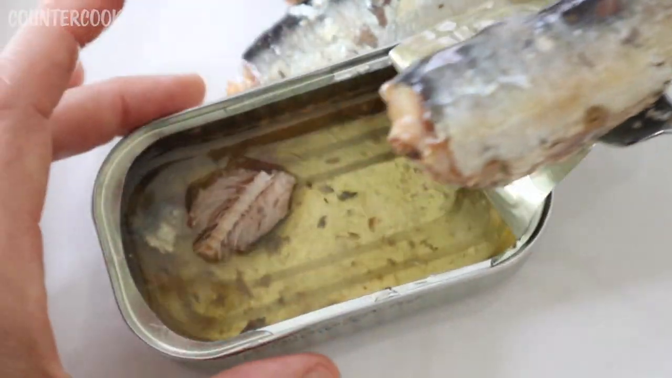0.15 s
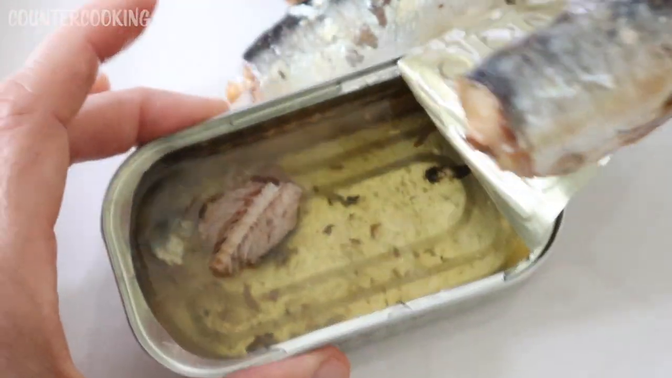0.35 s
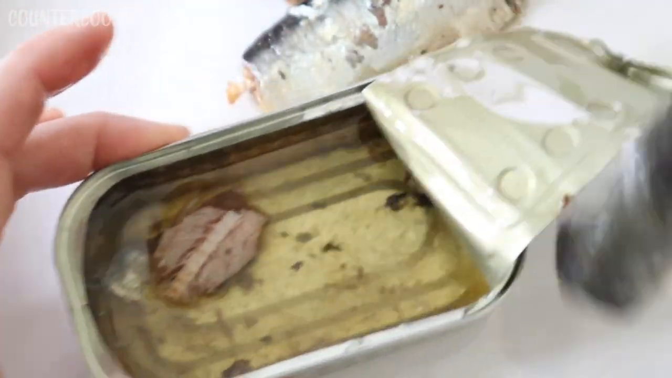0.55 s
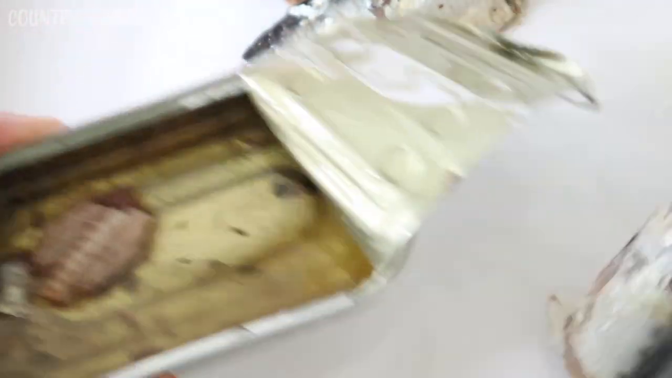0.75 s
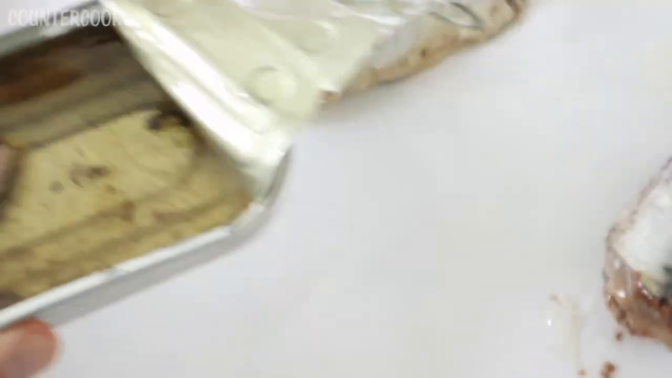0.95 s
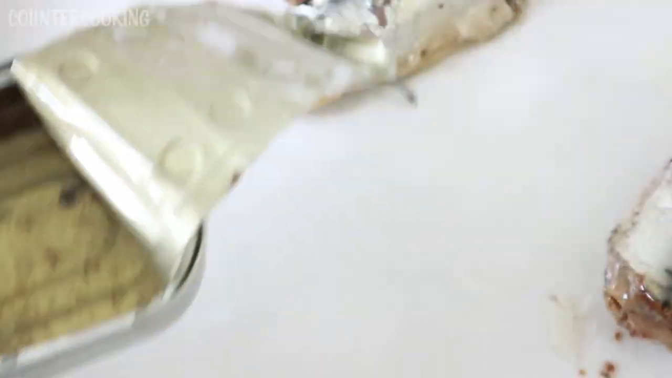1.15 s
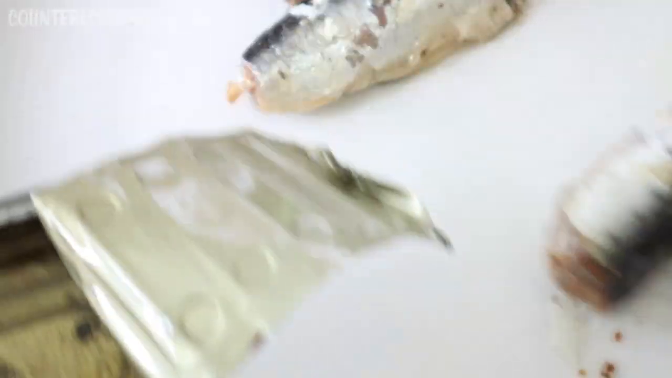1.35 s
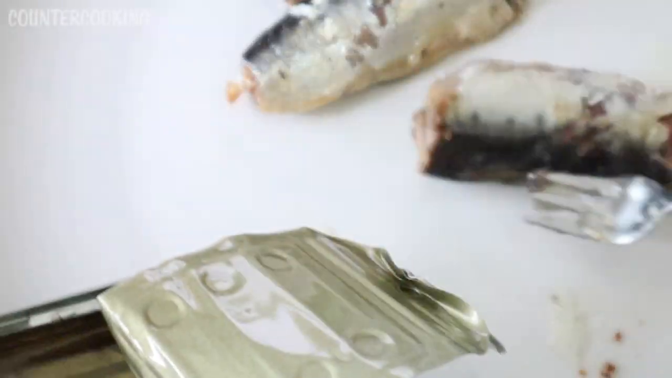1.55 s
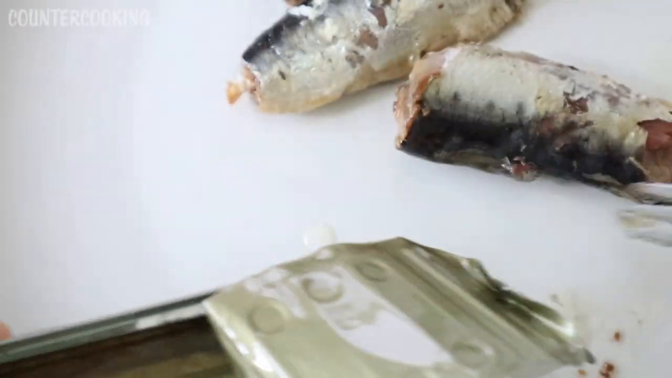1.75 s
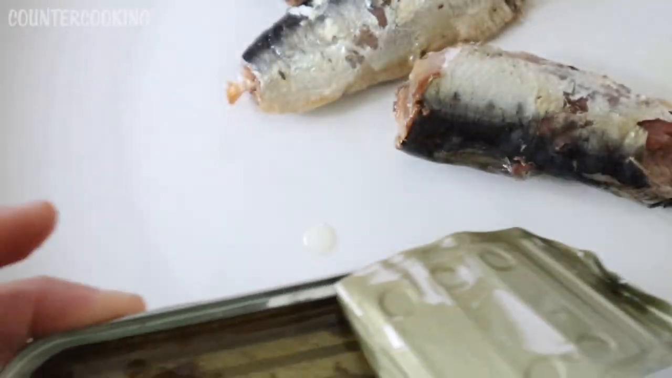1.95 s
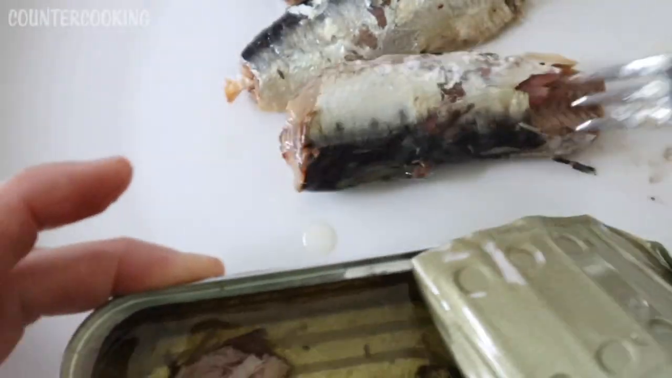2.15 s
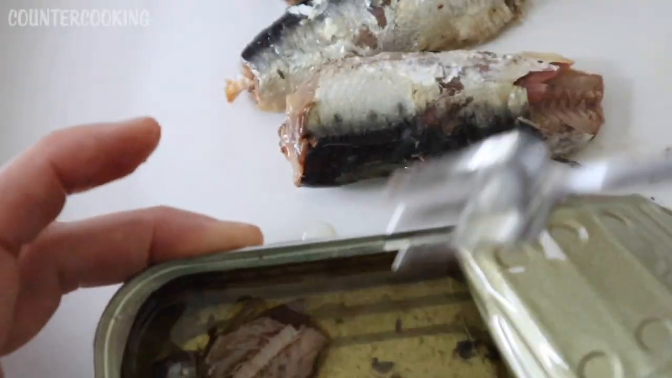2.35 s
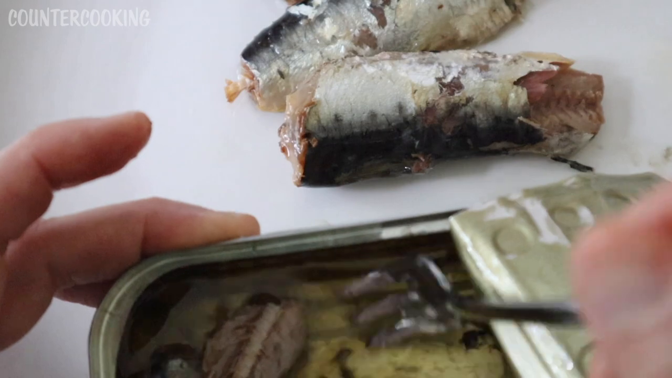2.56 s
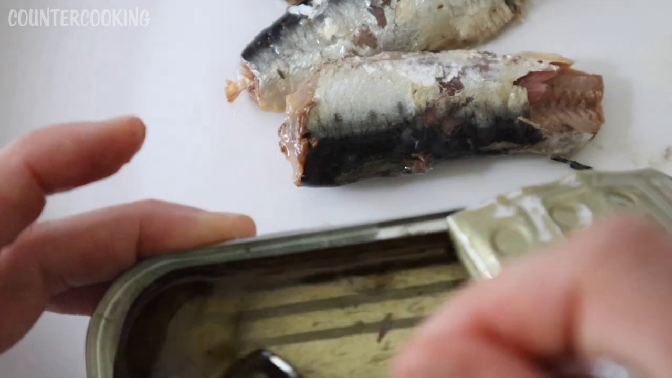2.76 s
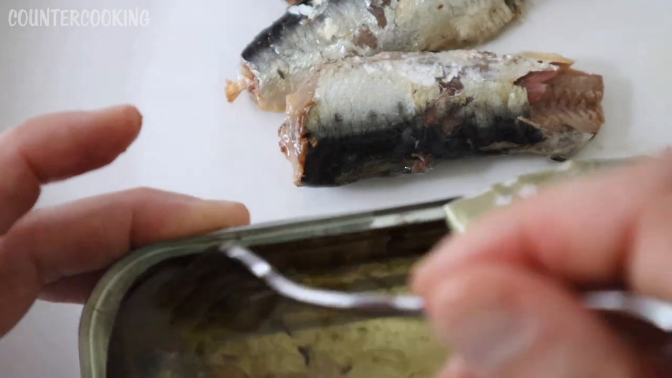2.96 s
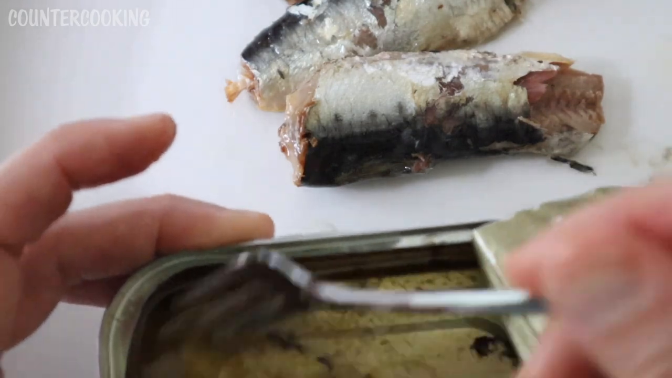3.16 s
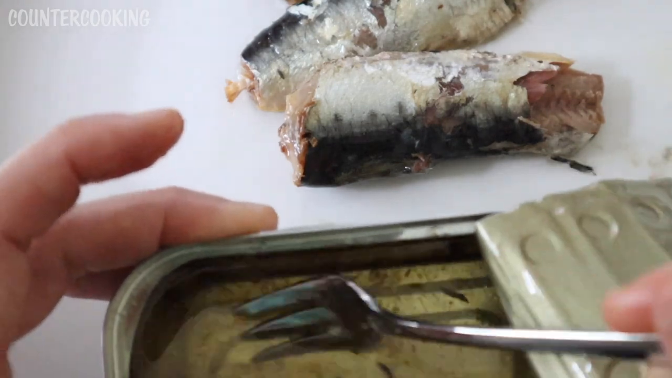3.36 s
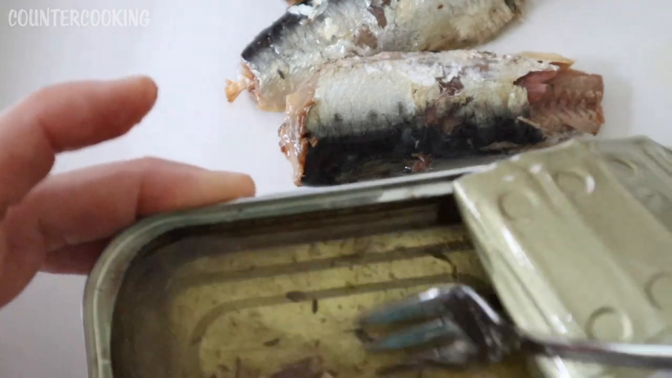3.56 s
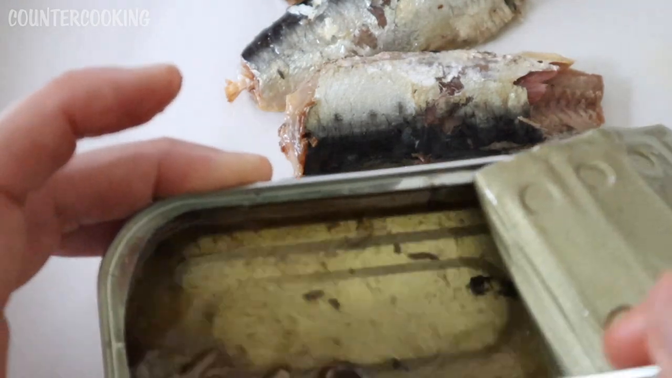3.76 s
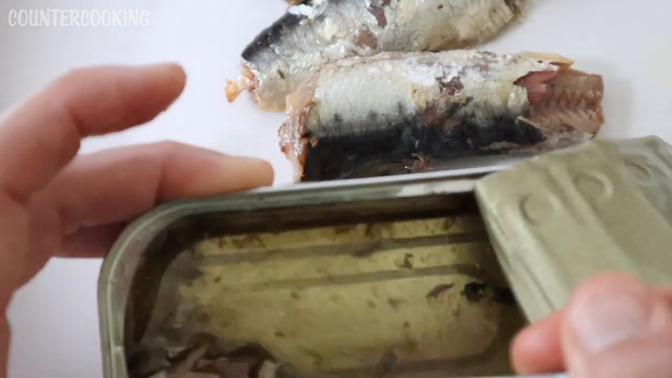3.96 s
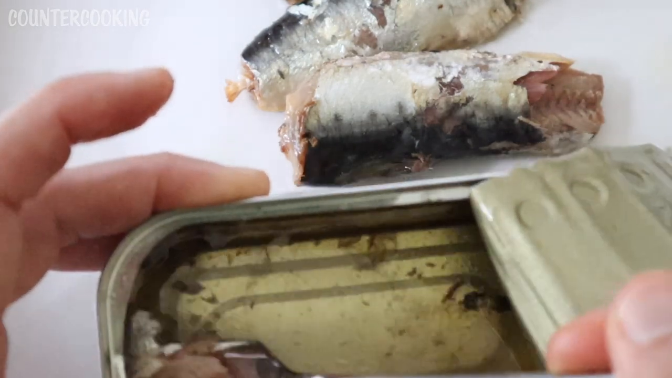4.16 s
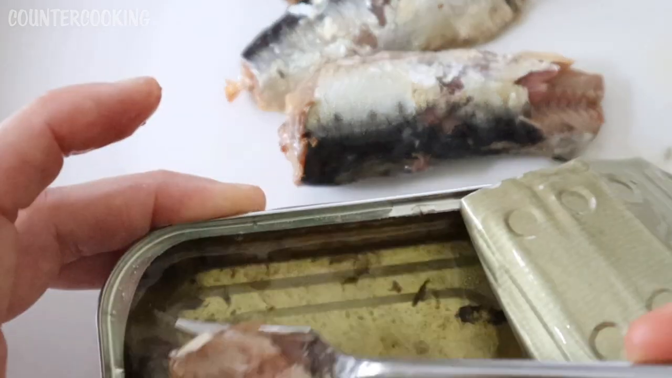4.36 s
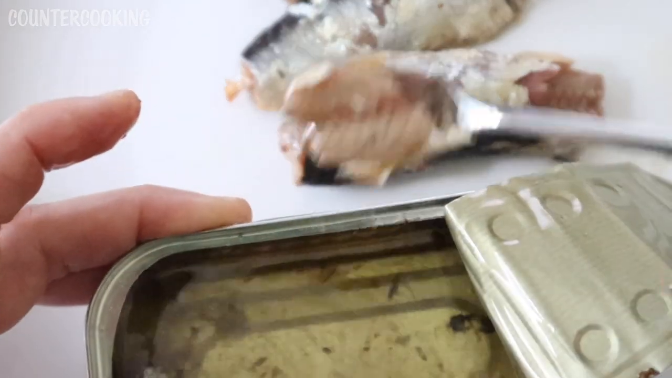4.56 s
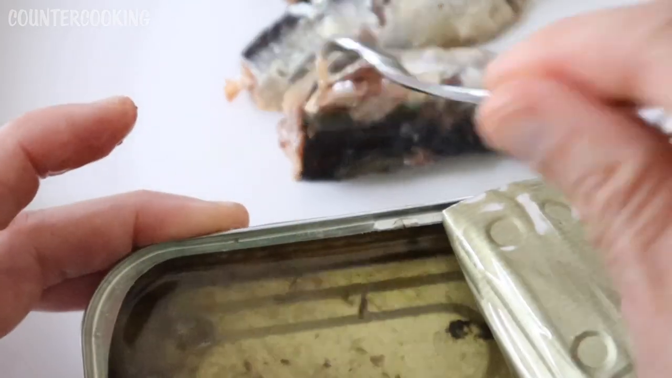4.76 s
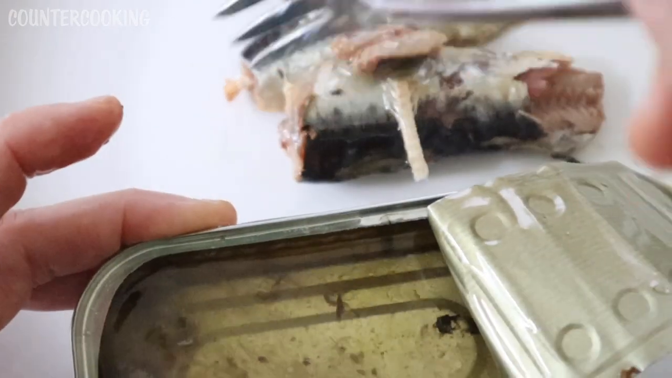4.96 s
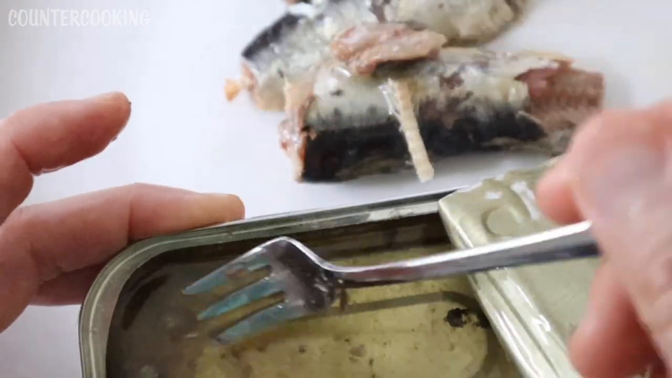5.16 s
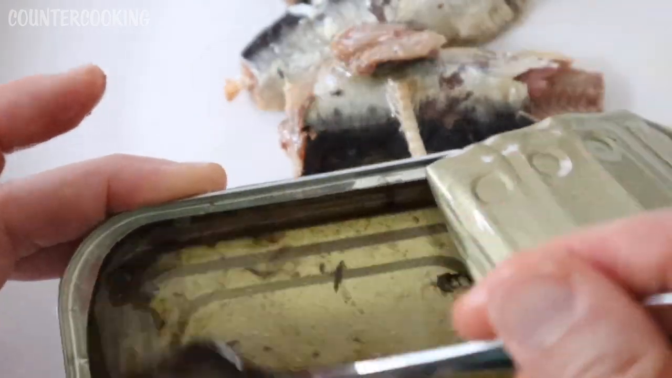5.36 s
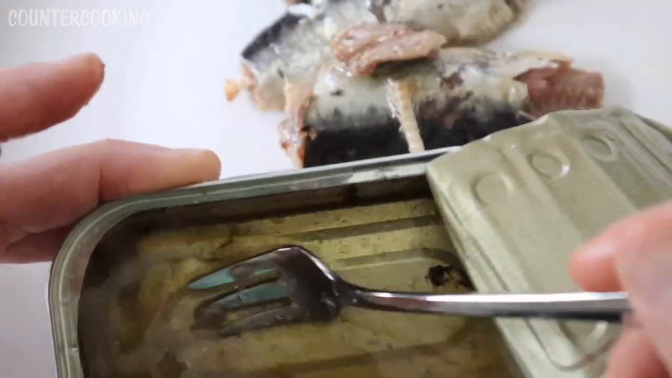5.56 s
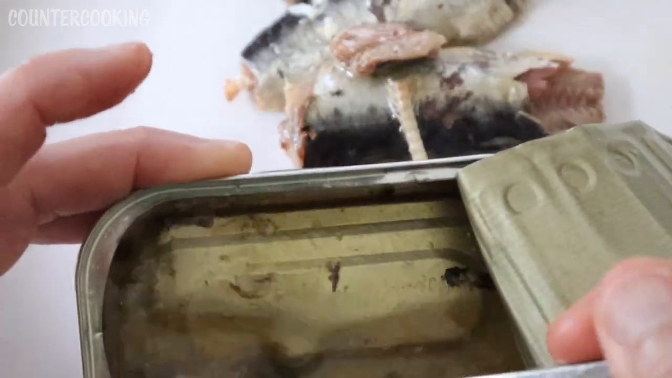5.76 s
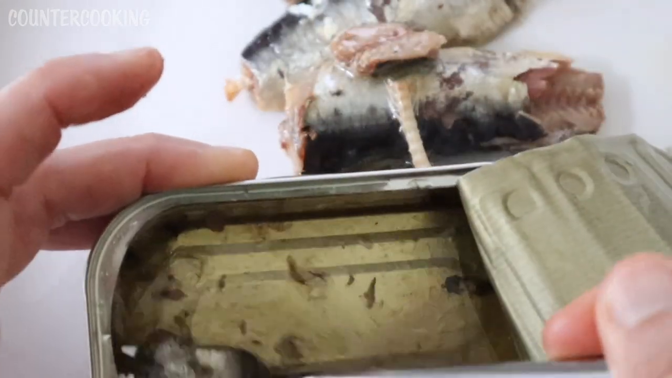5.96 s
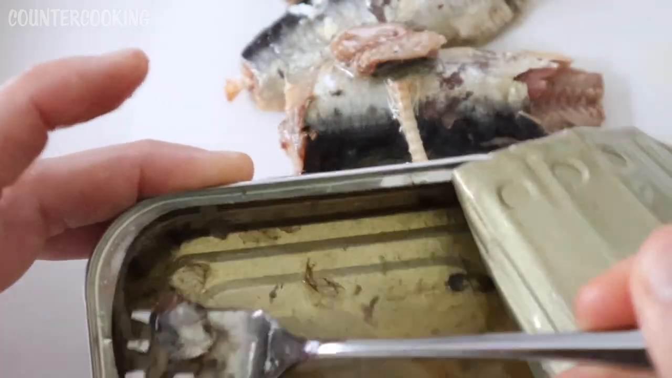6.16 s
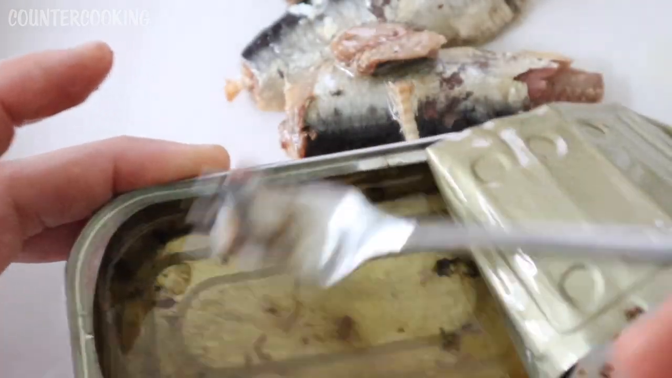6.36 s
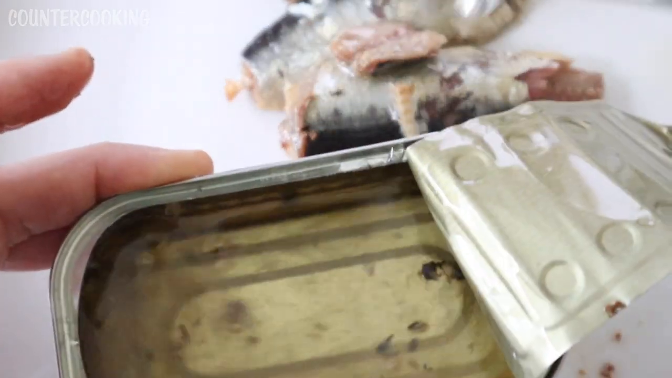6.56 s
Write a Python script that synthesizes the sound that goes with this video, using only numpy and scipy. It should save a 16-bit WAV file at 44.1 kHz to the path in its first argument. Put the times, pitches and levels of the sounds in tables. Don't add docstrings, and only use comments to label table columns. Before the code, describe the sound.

A small sheet-metal can is shifted and set down with woody booms, then a fork works in it: bright rim clinks, hard dry jabs, gritty scrapes and tiny metallic squeals in uneven bursts with gaps between. The rings are short and damped by hand and oil. Close stereo microphones in a small hard room, with soft hiss and low faraway traffic.

```python
import sys
import numpy as np
from scipy import signal
from scipy.io import wavfile
from scipy.ndimage import uniform_filter1d

SR = 44100
rng = np.random.default_rng(int(sys.argv[2]) if len(sys.argv) > 2 else 0)


def nominal_scale(level):
    x = np.asarray(level, float) / 20
    return 10 ** x


def dump_mix(stems):
    frames = np.atleast_2d(stems).T
    limited = np.clip(frames, -1, 1)
    pcm = np.round(limited * 32767).astype(np.int16)
    wavfile.write(sys.argv[1], SR, pcm)


N = 291554

# pitch_hz, level_db (per Hz)
HUSH_MID = [(12, -28.5), (20, -6.5), (70, 1), (130, -4.5), (248, -5.5), (310, -8.5), (422, -12.5),
            (873, -17.5), (2000, -23), (4000, -29.5), (7000, -37.5), (9400, -44), (12000, -45.5),
            (16000, -68.5)]
HUSH_SIDE = [(12, -37), (20, -3), (55, -11), (193, 1.5), (434, 1.5), (897, -2), (1610, -4.5), (7110, -19),
             (14300, -34), (16000, -21)]
HUSH_DB = -48.5
# time_s, level_db
RUMBLE = [
    (1.199, -50.5),
    (3.2, -51.5),
    (3.601, -52.5),
    (4.3, -53),
    (6.09, -50.5),
    (6.45, -51),
]
# pitch_hz, fade_s (time to fall 60 dB)
ROOM = [(130, 0.26), (300, 0.47), (800, 0.18), (2100, 0.23), (5500, 0.29), (11000, 0.21)]
# pitch_hz, level_db (side against mid)
WIDE = [(60, -47), (110, -61), (200, -53), (380, -35), (700, -39), (1290, -42), (2380, -19), (4400, -10.5),
        (8120, -5.5), (15000, 2.5)]

# start_s, level_db (peak), tilt_db (per octave), ring_length (factor), free_ring_s
DRAG_THUDS = [
    (.684, -13.5, -0.13, 0.48, 0.11),
    (.706, -15.5, -0.24, 0.69, 0.065),
    (.735, -24, 0.84, 1, 0.046),
    (.772, -23, -1.5, 0.34, 0.022),
]
SET_DOWN_THUDS = [
    (.927, -9.5, -0.1, 0.67, 0.12),
    (.944, -17.5, 4.5, 0.28, 0.11),
    (4.802, -33.5, -5.5, 1, 0.18),
]
PLATE_KNOCKS = [
    (2.107, -21, -.3, 0.11, .16),
    (2.129, -33, -.3, 1, 0.28),
]
FOOT_KNOCKS = [
    (3.588, -42, -.3, 0.45, .1),
    (3.899, -39, -.3, 0.88, .1),
    (5.42, -42, -.3, 0.75, .1),
    (5.462, -41.5, -.3, 0.37, .1),
]
# pitch_hz, level_db, fade_s (60 dB)
TABLE_MODES = [(131.3, -1.5, 0.46), (176, 2, 0.165), (235.4, -5, 0.23), (336.5, -9, 0.21),
               (448, -13.5, 0.3), (693, -7.5, 0.092), (525, -9.5, 0.1), (885, -0.5, 0.043),
               (1300, -1.5, 0.03)]
PRESSED_TABLE_MODES = [(132.7, -4, 0.14), (174, -2.5, 0.15), (248.5, -16, 0.38), (320, -11.5, 0.07),
                       (441, -14, 0.17), (517, -17.5, 0.089), (630, -17, 0.052), (790, -23, 0.071),
                       (870, -12.5, 0.058), (1050, -37, .05)]
PLATE_MODES = [(160.4, -12, 0.95), (254, 0, 0.5), (316, -5.5, 0.51), (482, 6, 0.17), (660, -53, 0.12)]
FOOT_MODES = [(447, 8, 0.058), (505, -7, 0.014)]

# start_s, level_db (peak), tilt_db (per octave), ring_length (factor)
TICKS = [(.5128, -50, -9, .4), (0.5715, -40, -17, .5), (.638, -39, 2, 0.55), (0.673, -32.5, -18, 0.45),
         (0.7111, -32, -16, 0.46), (2.107, -34.5, 3, 1.2), (2.221, -46, 6, .2), (3.311, -35, 2, .25),
         (3.327, -24, 21, .55), (3.641, -24.5, 2, 0.28), (4.292, -50, -1, .2), (5.613, -33, 2.5, 0.24),
         (6.011, -34, -4, 0.34), (6.176, -41.5, -2.5, 0.23)]
# pitch_hz, level_db, fade_s (60 dB)
TINE_MODES = [(3290, 3.5, 0.054), (4200, 0, 0.048), (5740, -3, 0.054), (6500, 2.5, 0.063), (7700, -3, .06),
              (8580, -2, .07), (9430, -2.5, 0.068), (9720, -6, 0.067), (10880, -3, .05)]
# start_s, length_s, from_hz, to_hz, level_db
SQUEAKS = [
    (2.703, 0.037, 4046, 3950, -35.5),
    (2.745, 0.039, 2720, 2637, -37.5),
    (4.14, .045, 2900, 3240, -41),
    (4.125, 0.049, 8000, 6800, -60.5),
    (4.15, 0.047, 1600, 1850, -40),
    (5.375, 0.0366, 1765, 2055, -30.5),
    (5.385, .03, 3100, 3650, -39),
    (5.445, 0.031, 2078, 2030, -25.5),
]
SQUEAK_WIDTH_HZ = 57

# peak_s, rise_s, fall_s, walls_db, bottom_db (against the walls)
SLIDE_RUBS = [
    (.02, 0.022, 0.3, -68, -17),
    (.425, 0.089, 0.036, -63, -15),
    (.55, 0.15, .1, -66, -23),
    (.636, 0.12, 0.037, -48, -30),
    (0.684, 0.0067, 0.054, -50, 2),
    (0.744, 0.049, 0.0087, -48, 1.5),
]
LID_RUBS = [
    (2.14, 0.012, 0.062, -44, -11),
    (2.19, 0.022, 0.077, -50, 2),
]
DIG_RUBS = [
    (2.689, 0.041, 0.097, -39, -13),
    (2.721, 0.028, 0.048, -39.5, -32),
    (2.779, 0.029, 0.049, -44, -3),
]
NEAR_RUBS = [
    (3.492, 0.096, 0.095, -50, -35),
]
CORNER_RUBS = [
    (3.72, 0.052, 0.077, -56, 7),
]
SKID_RUBS = [
    (3.77, 0.02, 0.02, -41.5, -6.5),
    (3.819, 0.057, 0.066, -53.5, -17),
]
LIFT_RUBS = [
    (3.933, 0.017, 0.041, -41, -35),
    (4.006, 0.069, 0.13, -49.5, -9),
]
SQUEAL_RUBS = [
    (4.101, 0.039, 0.055, -61, 16.5),
    (4.176, 0.071, 0.011, -42.5, -35),
]
SWEEP_RUBS = [
    (5.364, 0.01, 0.032, -34, -18),
    (5.387, 0.042, 0.063, -42, -3),
    (5.432, 0.0072, 0.013, -59, -26),
    (5.463, 0.05, 0.021, -36.5, -42),
]
LAST_RUBS = [
    (5.735, 0.097, 0.032, -61.5, 15),
    (5.756, 0.025, 0.01, -31.5, -43),
    (5.885, 0.03, 0.095, -55, -2.5),
    (5.998, 0.042, 0.035, -42, -11.5),
]

# start_s, walls_db (peak), bottom_db and rim_db (against the walls), ring_length (factor)
SLIDE_CLINKS = [
    (0.1947, -42.5, -13, 3, 0.39),
    (0.538, -39.5, -10, 2, 0.83),
    (0.567, -33.5, -19, 5.5, 0.94),
    (0.631, -27.5, -31, 0, 1),
    (0.7348, -29.5, -18, -3, 0.53),
]
FORK_CLINKS = [
    (0.9252, -26.5, 2.4, -5.5, 1),
]
LID_CLINKS = [
    (2.106, -14.5, 1.5, -1, 0.95),
    (2.128, -12, -15, -0.5, 1),
    (2.148, -31, -8, -4, .6),
    (2.182, -21.5, -7.5, -15, 0.52),
    (2.195, -33, -5, -5, .6),
]
RIM_CLINKS = [
    (2.236, -9.5, -20, 4, 0.99),
    (2.2448, -8.5, -20, -1, 0.89),
    (2.2506, -19.5, -14, -11, 0.63),
]
DIG_CLINKS = [
    (2.6414, -9.5, -11.5, -12.5, 0.54),
    (2.651, -20, -10, -11, 0.35),
    (2.6691, -14.5, -14, -18, 0.33),
    (2.6987, -38, -18, -7, .5),
    (2.72, -26, -13, -14, 0.45),
    (2.749, -29, -13, -1, 0.5),
    (2.783, -37, -16, 8, 0.45),
]
POKE_CLINKS = [
    (3.0647, -13.5, -8.5, -8, 1),
    (3.068, -11, -11.5, -15, 0.66),
    (3.125, -31.5, -19, -17, 0.47),
]
JAB_CLINKS = [
    (3.2441, -3, -22, -15, 0.26),
    (3.248, -15.5, -17, -6, 0.36),
    (3.3145, -25.5, -14, -26, 0.15),
]
NEAR_CLINKS = [
    (3.3264, 2, -11, -7.5, 0.56),
    (3.3305, -7.5, -16, -20, 0.6),
    (3.493, -41.5, -3, -29.5, .9),
    (3.5444, -30, -6.5, -11, 0.3),
]
CORNER_CLINKS = [
    (3.5877, -3, -14.5, -9, 0.84),
    (3.6404, -10, -11.5, -17.5, 0.35),
]
SKID_CLINKS = [
    (3.7683, -25.5, -15, -12.5, 0.93),
]
LIFT_CLINKS = [
    (3.881, -36.5, -28, -16, 0.99),
    (3.899, -9, -16, -22, 0.66),
    (3.9974, -32.5, -3, -5, 0.2),
    (4.0944, -37.5, 1.5, -28, 0.64),
    (4.115, -34, -5.5, -19, 1),
    (4.276, -48, -13, 10, .6),
    (4.2838, -25, -7, -3, 0.6),
]
TAP_CLINKS = [
    (5.2651, -5, -14, -13, 0.38),
    (5.3327, -28.5, 0, -8, 0.83),
]
SWEEP_CLINKS = [
    (5.3554, -17.5, -18, -12, 0.74),
    (5.3845, -26, -8, -11, 0.56),
    (5.4192, -9.5, -32, -2, 0.63),
    (5.4225, -9.5, -23, -27, 0.47),
    (5.4314, -24, -7.5, -9, 0.47),
    (5.449, -27, -1, -10, 0.43),
    (5.4625, -20, -8, -22, 0.26),
    (5.4666, -17, -27, -23, 0.27),
]
PRY_CLINKS = [
    (5.6143, -12, -12, -20, 0.69),
    (5.6185, -17, -19, -13, 0.53),
    (5.6225, -18.5, -18, -17, 0.39),
]
LAST_CLINKS = [
    (5.695, -18, -12.5, -12, .9),
    (5.721, -23.5, -2, -19, 0.42),
    (5.748, -18, -5.5, -29, 0.49),
    (5.7405, -23, -8, -4, .4),
    (6.1751, -40, 6, -17, .9),
    (6.1973, -31.5, -25, -23, 0.25),
]

# pitch_hz, level_db, fade_s (60 dB)
SLIDE_MODES = [(1410, 0, 0.064), (1936, 12, 0.045), (2270, 1, 0.073), (3045, 14.5, 0.039),
               (3265, 13, 0.032), (3440, 6, 0.044), (3860, 5.5, 0.04), (4090, 2.9, 0.043)]
FORK_MODES = [(826, 32, 0.093), (1510, -3, 0.39), (2120, -16, 0.21), (2300, -3.5, 0.54), (3340, -3, 0.087),
              (4320, -4, 0.37), (6620, -23, 0.29), (9480, -8.5, 0.03), (11330, -12, .053)]
LID_MODES = [(729, -13.5, 0.2), (796, -6.5, 0.043), (816, -8, 0.036), (1373, 9, 0.033), (1550, -1, 0.11),
             (1795, 5, 0.05), (1930, 9, 0.039), (2400, -2, 0.056), (2770, -21, 0.12), (2970, -9.5, 0.094),
             (3390, -10, 0.11), (3880, -10, 0.034), (3920, -17, .04), (4360, -21, .1)]
RIM_MODES = [(784, -14, 0.11), (1470, -19, 0.47), (1670, -4, .09), (1773, 12.5, 0.07), (1967, 12.5, 0.098),
             (2830, -16, 0.13), (2910, -0.5, 0.045), (3220, -7, 0.073), (3436, -1.5, .06),
             (3650, -6, 0.049), (3894, -3.5, .07), (4130, -23, .06), (4800, -9, 0.05), (5020, -9, 0.044)]
DIG_MODES = [(807, 3, 0.11), (935, 4.5, 0.11), (1516, 14, 0.12), (1692, 21, 0.063), (1946, 19.5, 0.094),
             (2097, 15.5, 0.14), (2720, 3.5, 0.14), (3150, -2, .06), (3710, -12, 0.044), (4035, 4.5, 0.083),
             (4380, 3, 0.033), (7350, -21, 0.089), (9770, -7, 0.04)]
POKE_MODES = [(803, -8, 0.095), (1105, -11, 0.064), (1403, -5, 0.13), (1602, -1, 0.077), (1786, 1, 0.028),
              (1880, 1, 0.048), (2100, -6.5, 0.071), (2350, -13, .04), (2980, -6, 0.043),
              (3690, -4.5, 0.04), (4160, -20, 0.18), (4650, -3, 0.051)]
JAB_MODES = [(790, 4, 0.16), (1020, -27, 0.019), (1530, -13, 0.027), (1800, 3, 0.062), (1995, -0.5, 0.075),
             (2340, -10, .07), (2644, -1.5, 0.13), (2930, -13, .07), (3950, -7, 0.066)]
NEAR_MODES = [(810, -2, 0.13), (1024, 3.5, 0.038), (1303, -5, 0.086), (1430, -18.5, 0.074),
              (1633, -11, 0.12), (1714, -10.5, 0.11), (1850, -2.5, 0.093), (2110, -2.5, 0.065),
              (2480, -6, 0.034), (2630, -13, 0.071), (3090, -15, 0.17), (3970, -22, 0.087),
              (4140, -6, 0.031), (4940, -31, 0.092)]
CORNER_MODES = [(847, -8, 0.067), (1638, 15.5, 0.12), (1853, 21, 0.074), (1986, 23.5, 0.068),
                (2315, 39.5, 0.019), (2640, 8, 0.081), (2720, -33, 0.062), (3030, 18.5, 0.066),
                (4020, -3.5, 0.11), (5160, 7, 0.041)]
SKID_MODES = [(840, -21, .12), (1270, -11.5, 0.13), (1963, 1, 0.061), (2080, -17, .1), (2530, -16, .06),
              (2930, -26, .1), (3370, -23, .08), (4118, -34, 0.074), (4430, -28, .034), (5660, -40, .1)]
LIFT_MODES = [(859, -2, 0.11), (1365, -6.5, 0.074), (1600, -11, 0.053), (1860, 3.5, 0.03), (1998, -3, 0.14),
              (2290, -9, 0.12), (2460, -10, 0.028), (2880, -16, 0.18), (3530, -34, .08)]
SQUEAL_MODES = [(880, -5, 0.21), (1500, 19, 0.068), (1750, 14, 0.075), (2070, 11.5, 0.057),
                (3010, 14, 0.07), (3220, -13, 0.061), (6750, -1, 0.027)]
TAP_MODES = [(801, -11, 0.13), (990, 0.5, 0.012), (1280, -8, 0.083), (1547, 2, .04), (1810, 1, 0.064),
             (2020, 3, 0.066), (2280, -20, 0.045), (2720, -10, .05), (3065, -12, 0.086), (3720, -12, .06)]
SWEEP_MODES = [(862, 8, 0.069), (1520, -25, .05), (1797, 10.5, 0.029), (1888, 4.5, 0.049), (2103, -3, 0.14),
               (2953, 7, 0.069), (3270, 7, 0.025), (3560, 6, 0.021), (4055, -0.5, 0.048), (4450, -26, .12)]
PRY_MODES = [(856, 2, .09), (1323, -13, 0.075), (1690, -8, 0.03), (1820, -8, 0.053), (2044, -3.5, 0.13),
             (2380, -26, 0.03), (3130, -9, 0.049), (3740, -32, .05)]
LAST_MODES = [(882, 9.7, 0.11), (924, 7.1, 0.075), (1486, 1.8, 0.062), (1746, 10.4, 0.05), (2160, 6, 0.041),
              (2024, 10.4, 0.062), (2980, 8.3, 0.092), (3420, 3, 0.063)]
# pitch_hz, level_db (per Hz)
SHEET = [(650, -36.5), (802, -16), (1000, -3), (1560, 14), (2040, 11), (2500, 11), (4030, 7.5),
         (5500, -3.5), (7960, -13), (10200, -9), (11700, -17), (13500, -58)]
PART_EDGES_HZ = [1150, 2600, 6000]
GRIPS = {"slide": (-22, -3, -16.5, -23), "fork": (-2, 0, 0, -13.5), "lid": (-24, -3, -19, -22.5),
         "rim": (-18, 0, 0, -19), "dig": (-9, -4.5, -18, -8), "poke": (-12, 0, 0, -22.5),
         "jab": (-21, 0, 0, -24), "near": (-14.5, -20, -24, -20.5), "corner": (-13, -15, -16, -13),
         "skid": (-10.5, -4.5, -20, -30), "lift": (-11, -16, -22.5, -18.5), "squeal": (0, -3.5, -18, -11),
         "tap": (-15, 0, 0, -22.5), "sweep": (-18, -3, -15, -19.5), "pry": (-25, 0, 0, -30),
         "last": (-26, -6, -19.5, -15)}


def evened(x):
    return x / np.sqrt(np.mean(x ** 2) + 1e-20)


def read(points, hz):
    f, value = np.transpose(points)
    return np.interp(np.log(hz + 1), np.log(f + 1), value)


def add(mix, s, sound):
    part = mix[:, round(s * SR):][:, :sound.shape[1]]
    part += sound[:, :part.shape[1]]


def hush(side_db=-1.0):
    frames = N // 512 + 5
    hz = np.fft.rfftfreq(2048, 1 / SR)
    a, b, patches = rng.standard_normal((frames, 1025, 2, 3)).T
    patches = uniform_filter1d(patches, 10, 1)
    patches = evened(uniform_filter1d(patches, 8, 2))
    colour_db = np.array([read(HUSH_MID, hz), read(HUSH_SIDE, hz)])[:, :, None]
    s, rumble_db = np.transpose(RUMBLE)
    swell_db = np.interp(np.arange(frames) * 512 / SR, s, rumble_db - np.mean(rumble_db))
    colour_db = colour_db + swell_db / (1 + (hz[:, None] / 130) ** 4)
    spectrum = (a + 1j * b) * nominal_scale(colour_db + 1.86 * patches)
    noise = signal.istft(spectrum, nperseg=2048, noverlap=1536)[1][:, :N]
    return np.array([nominal_scale(HUSH_DB) * evened(noise[0]), nominal_scale(HUSH_DB + side_db) * evened(noise[1])])


def room(side_db=-7):
    taps = np.zeros((2, SR // 2))
    slots = np.arange(200, SR // 2 - 20, 20)
    at = slots + rng.integers(0, 20, (2, len(slots)))
    np.put_along_axis(taps, at, rng.choice([-1., 1.], at.shape), 1)
    hz, t, z = signal.stft(taps, SR, nperseg=256)
    z = z * nominal_scale(-60 * t / read(ROOM, hz)[:, None])
    z[1] *= nominal_scale(side_db + 0.91 * read(WIDE, hz)[:, None] + 14.0)
    tail = signal.istft(z, SR, nperseg=256)[1]
    return tail / np.linalg.norm(tail[0])


def rings(hz, db, t60, spread, part, seconds=.22):
    phase = rng.uniform(-np.pi, np.pi, (2, len(hz))) * np.array([[spread], [1]])
    size = nominal_scale(db + np.outer([0, 1], read(WIDE, hz))) * np.exp(1j * phase)
    size = size * (part == np.arange(max(part) + 1)[:, None, None])
    pole = (2j * np.pi * hz - np.log(1000) / np.maximum(t60, .006)) / SR
    block = 128
    starts = np.exp(np.outer(block * np.arange(int(seconds * SR / block)), pole))
    within = np.exp(np.outer(pole, np.arange(block)))
    waves = (size[:, :, None] * starts) @ within
    return waves.imag.reshape(len(size), 2, -1)


def thuds(rows, modes):
    out = np.zeros((2, N))
    hz, db, t60 = np.transpose(modes)
    for s, peak_db, upper_db, length, free_s in rows:
        tilt_db = upper_db * np.log2(hz / hz[0])
        boom = rings(hz, db + tilt_db, length * t60, 0.37, np.zeros(len(hz), int), .45)[0]
        t = np.arange(boom.shape[1]) / SR
        stilled = 0.077 + 0.72 / (1 + (t / free_s) ** 10)
        boom = boom * -np.expm1(-t / 0.0038) * stilled
        add(out, s, nominal_scale(peak_db) * boom / abs(boom[0]).max())
    return out


def ticks():
    out = np.zeros((2, N))
    hz, db, t60 = np.transpose(TINE_MODES)
    spot_db = 3
    for s, peak_db, tilt_db, length in TICKS:
        touch_db = db + tilt_db * np.log2(hz / hz[0]) + spot_db * rng.standard_normal(len(hz))
        ring = rings(hz, touch_db, length * t60, 1.42, np.zeros(len(hz), int), .12)[0]
        add(out, s, nominal_scale(peak_db) * ring / abs(ring[0]).max())
    return out


def squeaks():
    out = np.zeros((2, N))
    a, b = rng.standard_normal((2, len(SQUEAKS), 4000))
    keep = np.exp(-np.pi * SQUEAK_WIDTH_HZ / SR)
    slow_noise = signal.lfilter([1], [1, -2 * keep, keep ** 2], a + 1j * b)
    waver = 1 + 0.81 * evened(slow_noise.view(float)).view(complex)
    for (s, length, from_hz, to_hz, db), w in zip(SQUEAKS, waver):
        u = np.arange(min(round(length * SR), 2000)) / (length * SR)
        turns = length * u * (from_hz + (to_hz - from_hz) * u / 2)
        tone = w[-len(u):] * np.exp(2j * np.pi * turns)
        swell = np.sin(np.pi * np.minimum(u, 1))
        side = 1j * nominal_scale(read(WIDE, from_hz))
        add(out, s, nominal_scale(db) * swell * (np.array([[1], [side]]) * tone).real)
    return out


def tin(modes, length, crowd_db, spot_db, contact_s=0.00046, count=230):
    hz, db, t60 = np.transpose(modes)
    twin_hz = hz * (1 + .012 * rng.uniform(-1, 1, len(hz)))
    crowd_hz = np.linspace(760 ** .75, 13500 ** .75, count) ** (4 / 3)
    crowd_hz = crowd_hz * rng.uniform(0.94, 1.01, count)
    crowd = crowd_db + read(SHEET, crowd_hz) + 3 * np.log10(crowd_hz / 2000)
    crowd_t60 = 0.008 * 8.6 ** rng.random(count)
    longest_s, twin_db, spread = .35, -5, .3
    hz = np.r_[hz, twin_hz, crowd_hz]
    t60 = np.minimum(np.r_[t60, .7 * t60, crowd_t60], longest_s)
    db = np.r_[db, db + twin_db, crowd]
    db = db + spot_db * rng.standard_normal(len(hz))
    parts = rings(hz, db, length * t60, spread, np.digitize(hz, PART_EDGES_HZ))
    parts = parts * -np.expm1(-np.arange(parts.shape[2]) / (contact_s * SR))
    radiated = signal.butter(4, [680, 15000], "band", fs=SR, output="sos")
    return signal.sosfilt(radiated, parts)


def rubs(strokes, modes, rim_db, tines_db, crowd_db):
    out = np.zeros((2, N))
    if not strokes:
        return out
    slips_per_s, uneven_db, blunt_hz, spots_per_s = 1800, 3.0, 11500, 24
    spot_db, margin_s = 5, .2
    ends_db, bend = -22, 1.2
    peak, rise, fall, db, bottom_db = np.transpose(strokes)[:, :, None]
    start_s = max(round(peak.min() - margin_s, 1), 0)
    t = np.arange(start_s, round(peak.max() + margin_s, 1), 1 / SR)
    away = np.where(t < peak, (peak - t) / rise, (t - peak) / fall)
    pressure = nominal_scale(db + ends_db * away ** bend)
    walls = pressure.sum(0)
    bottom = (pressure * nominal_scale(bottom_db)).sum(0)
    slips = (rng.random(len(t)) < slips_per_s / SR) * rng.choice([-1, 1], len(t))
    slips = slips * nominal_scale(uneven_db * np.minimum(rng.exponential(1, len(t)), 4))
    slips = evened(signal.sosfilt(signal.butter(4, blunt_hz, fs=SR, output="sos"), slips))
    pushes = [bottom, walls, walls * nominal_scale(rim_db), walls * nominal_scale(tines_db)]
    for spot in range(3):
        nearness = 2 / 3 ** .5 * np.cos(np.pi * (spots_per_s * t + spot) / 3) ** 2
        bent = np.array([1 + 0.037 * (spot - 1), 1, 1])
        parts = tin(modes * bent, 0.4, crowd_db - 5.5, spot_db)
        for part, push in zip(parts, pushes):
            force = slips * nearness * push
            add(out, t[0], signal.fftconvolve(force[None], part / np.linalg.norm(part[0]), axes=1))
    return out


def clinks(rows, modes, tines_db, crowd_db):
    spot_db, tines_per_rim = 2, 0.58
    blunting, softening = 0.74, 0.038
    out = np.zeros((2, N))
    for s, db, bottom_db, rim_db, length in rows:
        longer_db = -blunting * (rim_db + 11.5) - softening * (db + 7.0)
        contact_s = min(0.00069 * nominal_scale(longer_db), .003)
        parts = tin(modes, length, crowd_db, spot_db, contact_s)
        size = nominal_scale([bottom_db, 0, rim_db, tines_db + tines_per_rim * rim_db]) * nominal_scale(db)
        add(out, s, np.tensordot(size / abs(parts[:, 0]).max(1), parts, 1))
    return out


def scene():
    close = thuds(SET_DOWN_THUDS, TABLE_MODES) + thuds(DRAG_THUDS, PRESSED_TABLE_MODES)
    close = close + thuds(PLATE_KNOCKS, PLATE_MODES) + thuds(FOOT_KNOCKS, FOOT_MODES)
    for grip, rows, strokes, modes in [
            ("slide", SLIDE_CLINKS, SLIDE_RUBS, SLIDE_MODES),
            ("fork", FORK_CLINKS, [], FORK_MODES),
            ("lid", LID_CLINKS, LID_RUBS, LID_MODES),
            ("rim", RIM_CLINKS, [], RIM_MODES),
            ("dig", DIG_CLINKS, DIG_RUBS, DIG_MODES),
            ("poke", POKE_CLINKS, [], POKE_MODES),
            ("jab", JAB_CLINKS, [], JAB_MODES),
            ("near", NEAR_CLINKS, NEAR_RUBS, NEAR_MODES),
            ("corner", CORNER_CLINKS, CORNER_RUBS, CORNER_MODES),
            ("skid", SKID_CLINKS, SKID_RUBS, SKID_MODES),
            ("lift", LIFT_CLINKS, LIFT_RUBS, LIFT_MODES),
            ("squeal", [], SQUEAL_RUBS, SQUEAL_MODES),
            ("tap", TAP_CLINKS, [], TAP_MODES),
            ("sweep", SWEEP_CLINKS, SWEEP_RUBS, SWEEP_MODES),
            ("pry", PRY_CLINKS, [], PRY_MODES),
            ("last", LAST_CLINKS, LAST_RUBS, LAST_MODES)]:
        clink_tines_db, rim_db, tines_db, crowd_db = GRIPS[grip]
        close = close + clinks(rows, modes, clink_tines_db, crowd_db)
        close = close + rubs(strokes, modes, rim_db, tines_db, crowd_db)
    close = close + ticks() + squeaks()
    echoes = nominal_scale(-8.5) * signal.fftconvolve(close[:1], room(), axes=1)[:, :N]
    mid, side = close + echoes + hush()
    return np.array([mid + side, mid - side])


def top_cut(x):
    return signal.sosfilt(signal.butter(12, 16100, fs=SR, output="sos"), x)


def record(dry):
    mix = np.clip(dry, -1, 1)
    return top_cut(mix)


dry = scene()
out = record(dry)
dump_mix(out)
```